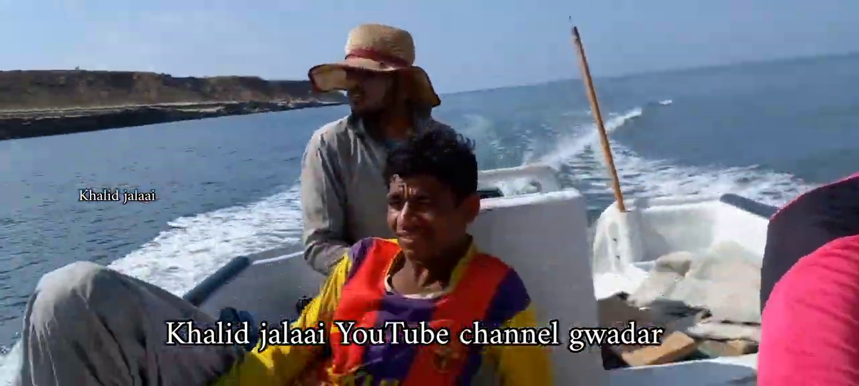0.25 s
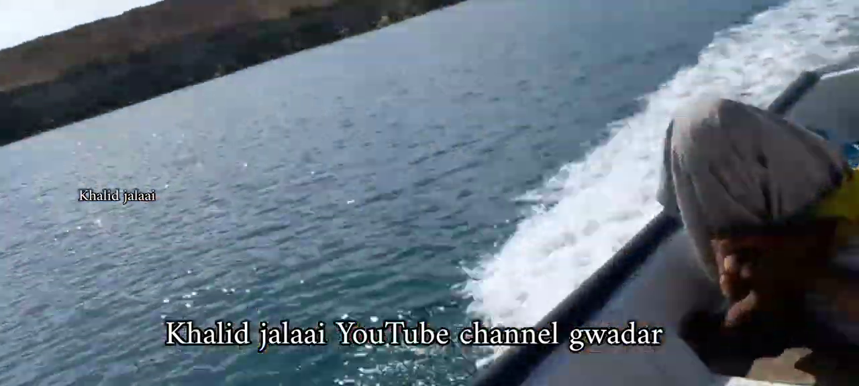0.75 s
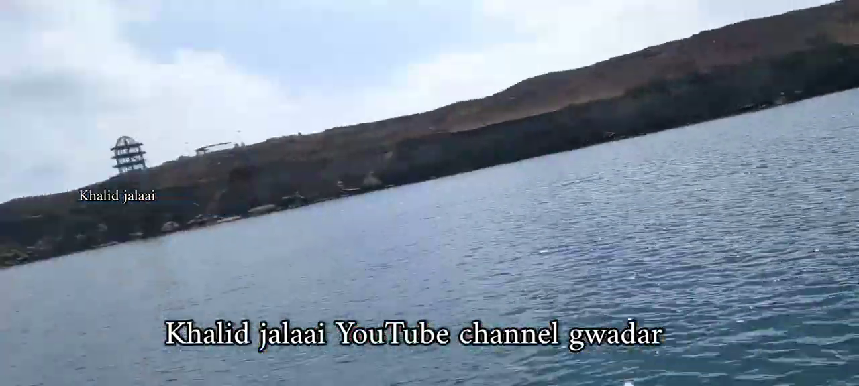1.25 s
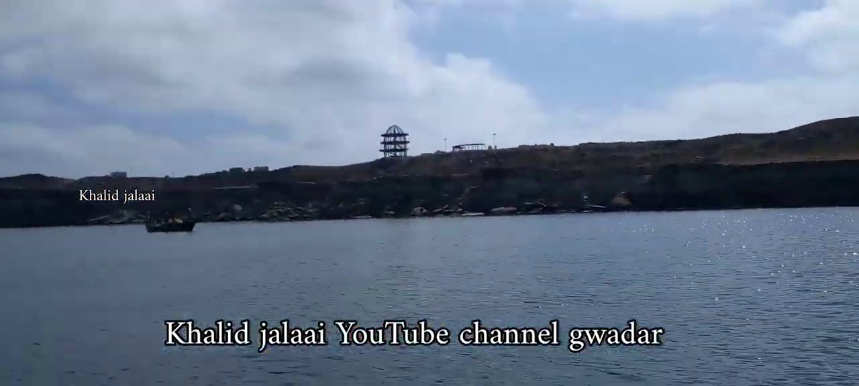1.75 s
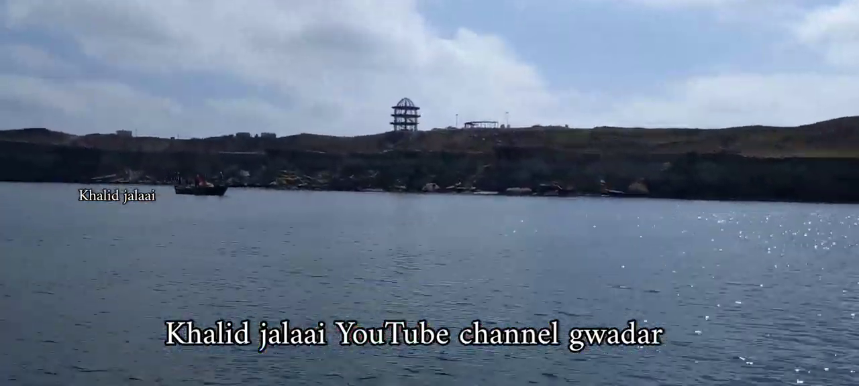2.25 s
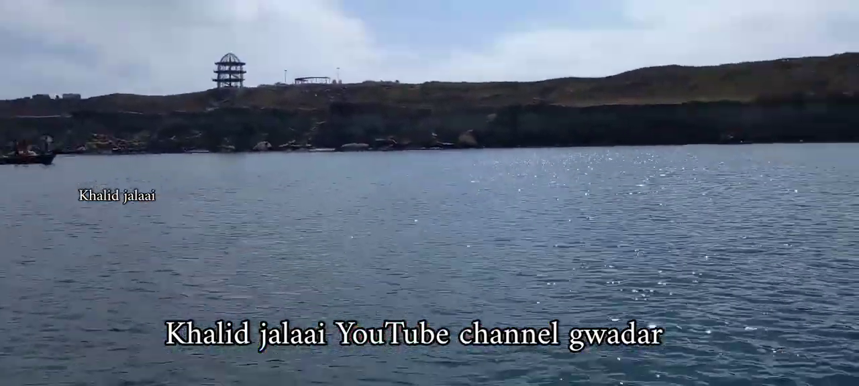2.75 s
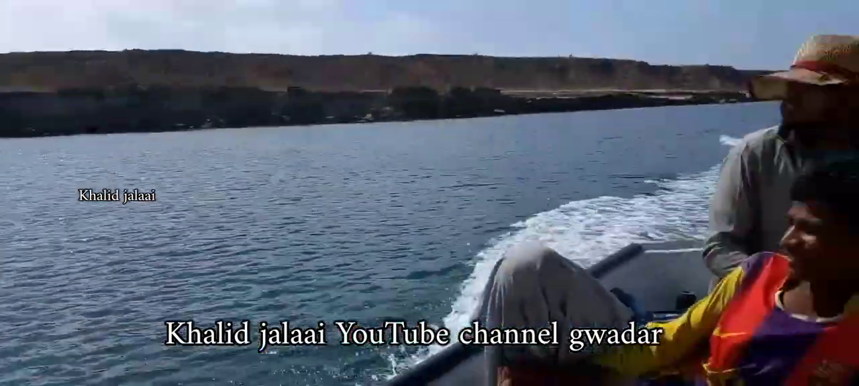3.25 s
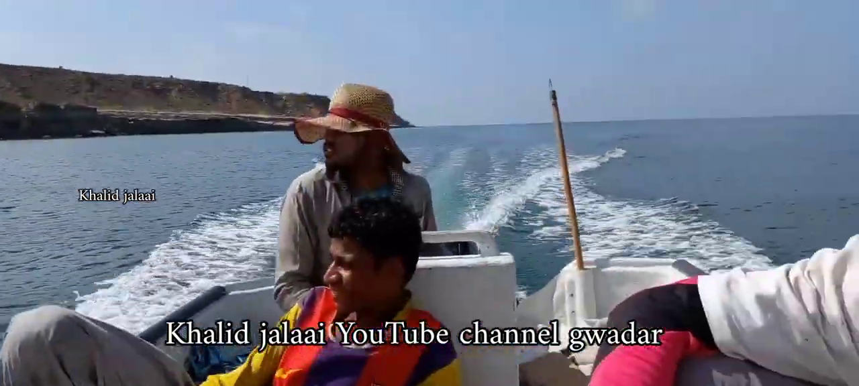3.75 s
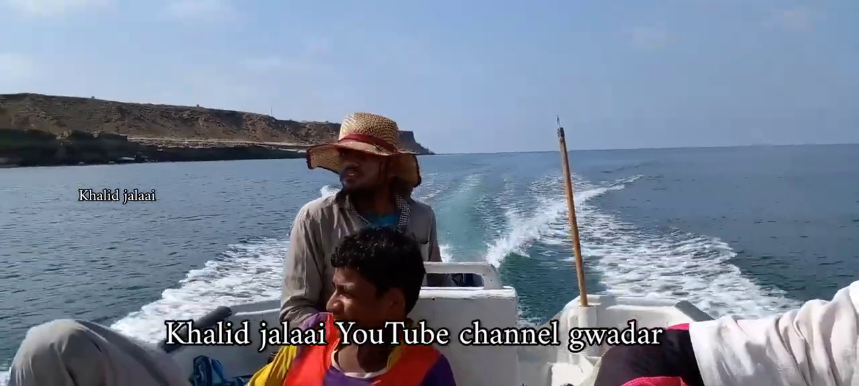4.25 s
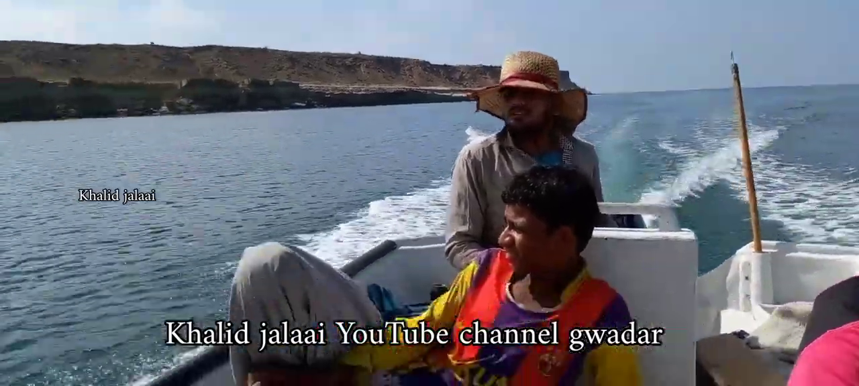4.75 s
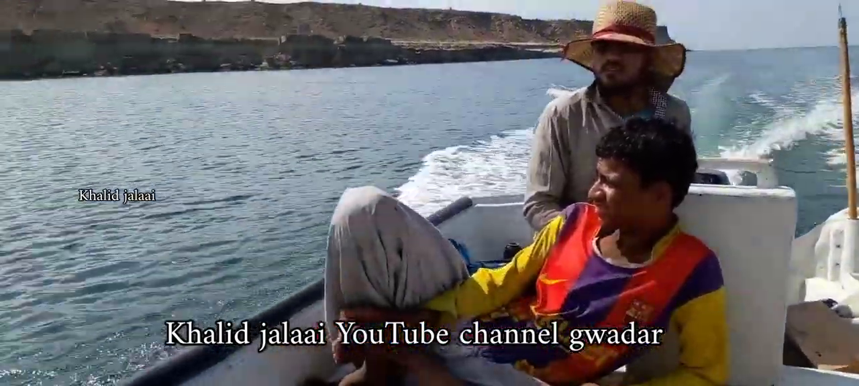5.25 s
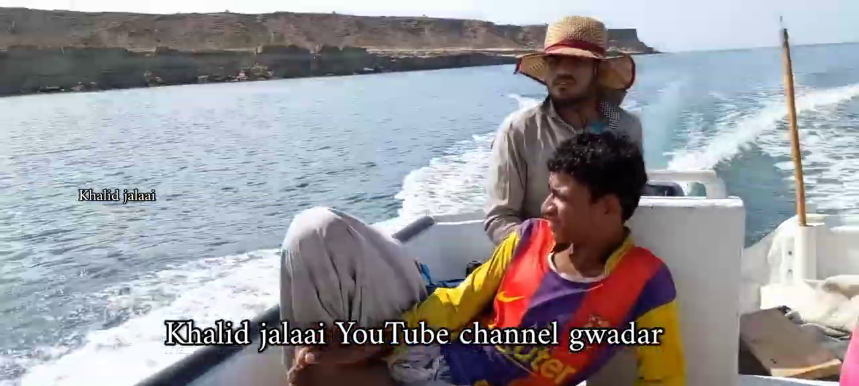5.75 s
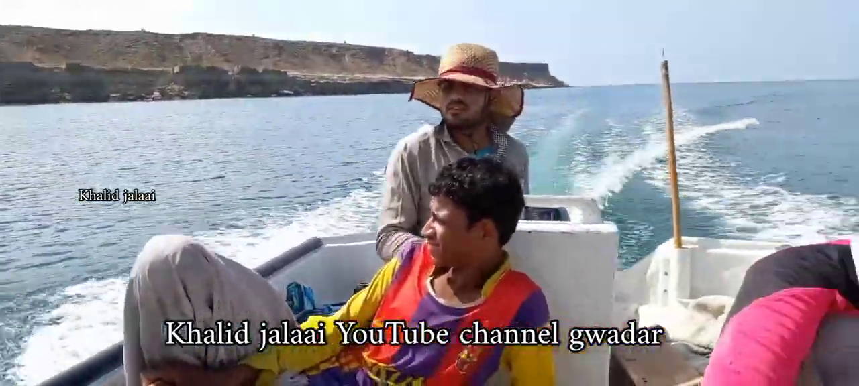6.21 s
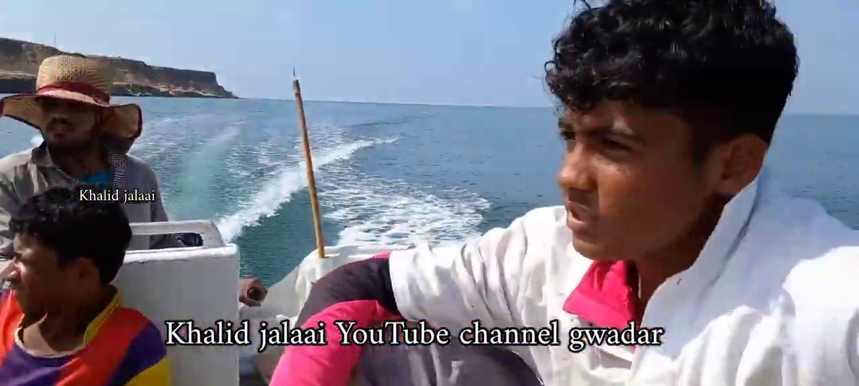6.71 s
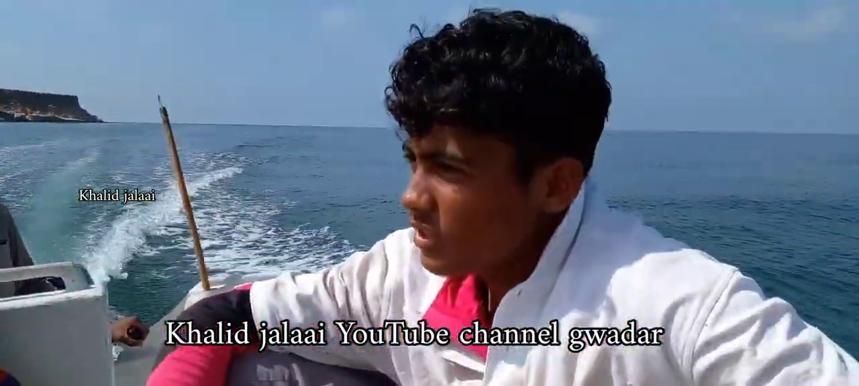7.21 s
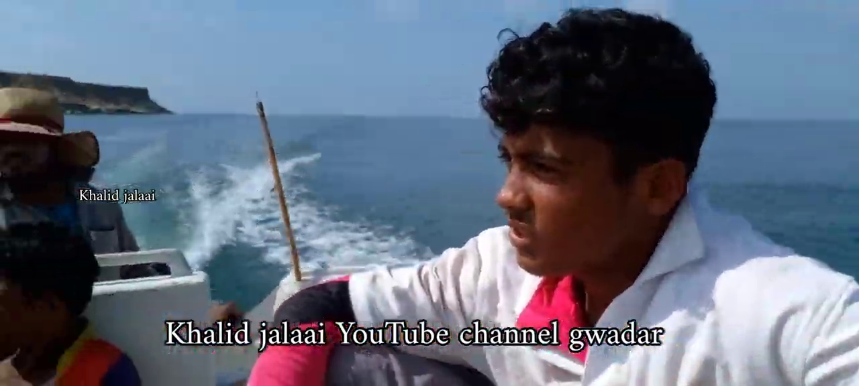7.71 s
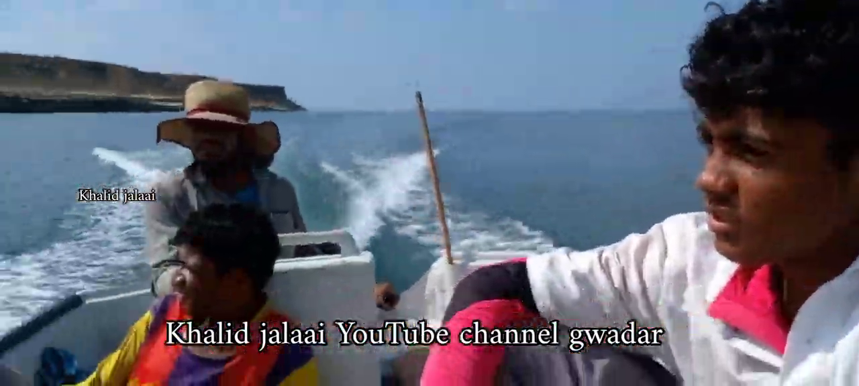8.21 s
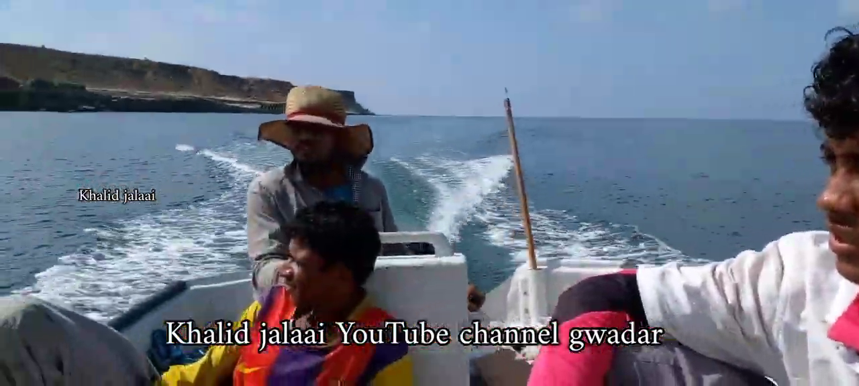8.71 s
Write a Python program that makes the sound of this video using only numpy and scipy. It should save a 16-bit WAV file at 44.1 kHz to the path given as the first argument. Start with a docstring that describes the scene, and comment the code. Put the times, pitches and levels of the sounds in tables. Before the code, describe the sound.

Aboard a small open boat at cruising speed, a two-stroke outboard drones low and raspy without pause, its cover rattling and propeller thrumming. Hard wind gusts thump the handheld microphone early on, then return in shorter bouts. Water rushes and hisses past the hull, swelling past the middle. Near the end the metallic rattle stands out as a last gust arrives.

```python
"""A small open boat cruises along a coast, heard on board through a hand-held microphone that moves about.
Throughout, a two-stroke twin outboard drones (shaft-locked tones), its propeller thrums, its cowling rattles
and the bow wave rushes and hisses (filtered noise and droplets). Wind gusts (shaped noise) buffet the microphone
hardest from 0.7 to 1.7 s, then in bouts; a hand hollows the rush from 0.8 to 3 s; the water swells near 5.3 s.
The engine speed sags and recovers, ending lower; the rattle is most exposed near 8.5 s, as a last gust comes."""
import sys
import numpy as np
from scipy import signal
from scipy.fft import rfft, irfft, next_fast_len
from scipy.io import wavfile
from scipy.ndimage import uniform_filter1d, minimum_filter1d

SR = 44100
rng = np.random.default_rng(int(sys.argv[2]) if len(sys.argv) > 2 else 0)


def to_wav(sig):
    """Store sig (one row per channel, or 1-D mono) as 16-bit WAV at the path in sys.argv[1].

    Samples outside -1..1 are clipped; the rate is SR.
    """
    pcm = np.clip(np.atleast_2d(sig), -1, 1) * 32767
    pcm = np.round(pcm).astype(np.int16)
    wavfile.write(sys.argv[1], SR, pcm.T)  # frames by channels


N = 395577
TIME = np.arange(N) / SR  # s

# crankshaft speed before its fine wobble: time_s, shaft_hz
SPEED = [(0, 97.3), (.8, 97.52), (2.7, 97.04), (3.1, 97.1), (3.7, 96.5), (4.4, 97.04), (5.2, 96),
         (5.6, 94.88), (6.5, 95.55), (7.65, 93.95), (8.1, 95.95), (8.97, 94.6)]
# microphone position and openness to the engine: time_s, place (0-2), exposure_db
PLACE = [(0, 0.35, -2.5), (.4, 0, 1), (1.1, 0.5, -2.5), (1.8, 0.56, -6), (2.7, 0.42, -3.5), (3.3, 0.79, -2),
         (4.3, 1.24, -3), (4.9, 1.07, -0.5), (5.6, 1.58, -1.5), (6.35, 1.6, -3), (7.3, 1.98, -3),
         (8.1, 2.2, 1), (8.55, 2.14, 2), (8.97, 1.72, -2)]
# gusts before sway: start_s, length_s, pressure_db, rumble_db (relative to pressure), eddy_hz
GUSTS = [(0, 0.17, -25.5, 0.5, 197), (0.731, 0.63, -15, -4.5, 590), (1.378, .33, -14.5, -9, 550),
         (1.781, 0.22, -20.5, -6.5, 477), (2.171, 0.64, -22, -5, 440), (2.92, 0.495, -17, -4, 488),
         (3.64, 0.11, -29, 5.5, 260), (4.326, 0.52, -24, -3, 295), (4.851, 0.22, -25.5, -4.5, 260),
         (5.86, 0.36, -22, 2, 199.9), (6.264, 0.098, -18, 5, 180), (6.587, 0.3, -31.5, 4, 240),
         (7.072, 0.056, -25.5, 7, 160), (8.501, 0.445, -21, 1.5, 291)]


def exhaust(angle):
    """Two cylinders fire once a turn each: a clean drone at twice the shaft speed, with harmonics."""
    # exhaust note as the microphone moves: time_s, firing_db, harmonic_2_db, harmonic_3_db
    exhaust_levels = [(0.02, -22, -25.5, -28), (0.306, -17, -26, -27), (0.73, -16, -34, -24.5),
                      (2.14, -19.5, -26, -47.5), (2.17, -22, -23, -54), (3.3, -16, -29, -32),
                      (3.5, -29, -38, -31.5), (3.54, -17, -43.5, -33.5), (4.08, -16.5, -40, -30.5),
                      (4.21, -16, -32.5, -32), (4.96, -19.5, -30, -27.5), (5.54, -15, -43, -34.5),
                      (5.67, -14, -32, -31), (6.23, -23.5, -32.5, -32), (6.46, -21, -31, -43.5),
                      (6.9, -22.5, -22, -39.5), (8.61, -22, -22.5, -30.5), (8.85, -19, -23, -34)]
    waver_db = 1.0
    out = 0
    for harmonic, db in enumerate(curves(exhaust_levels), start=1):
        out = out + undb(db + waver_db * walk(14)) * tone(angle, 2 * harmonic)
    return out


def overtones(angle):
    """Unequal cylinders knock the cowling once a turn, filling in shaft multiples; reflections vary by place."""
    # weaker engine tones: shaft_multiple, place_0_db, place_1_db, place_2_db
    overtone_levels = [(1, -26, -37, -30), (3, -33, -32.5, -27.5), (5, -32, -47.5, -36),
                       (7, -46, -55, -41.5), (8, -45.5, -48, -40.5), (9, -51, -59.5, -40.5),
                       (10, -41.5, -48.5, -50), (11, -53.5, -47.5, -50), (12, -49.5, -53, -41.5),
                       (13, -53, -49, -51), (14, -50.5, -53.5, -41.5), (15, -44, -38.5, -45.5),
                       (16, -42, -50.5, -46.5), (17, -63, -38.5, -44.5), (18, -51, -49, -45.5),
                       (19, -50, -57, -46.5), (20, -46.5, -48.5, -47.5), (22, -47, -45.5, -72),
                       (23, -54, -51.5, -50.5), (34, -64.5, -65, -60.5), (36, -77, -64.5, -59),
                       (38, -76.5, -64, -61.5)]
    fade_db, rough_db = 2.0, 1.07
    wander_rad, jitter_rad = 1.0, 0.016
    shaded_hz = 905.0  # exposure acts in full from here up
    place, exposure_db = curves(PLACE)
    shaft_hz, = curves(SPEED)
    # every burn comes a little early or late, which makes the high lines rasp
    angle = angle + jitter_rad * walk(95)
    out = 0
    for multiple, *levels_db in overtone_levels:
        # long waves bend round the passengers; short ones are shaded and scattered
        shortness = np.minimum(multiple * shaft_hz / shaded_hz, 1)
        place_db = np.interp(place, np.arange(len(levels_db)), levels_db)
        shade_db = shortness * (exposure_db + rough_db * walk(40))
        db = place_db + fade_db * walk(5) + shade_db
        phase = multiple * angle + wander_rad * walk(3)
        out = out + undb(db) * np.sqrt(2) * np.cos(phase)
    return out


def propeller(angle):
    """Blade beats thrum through the hull; each firing kicks the blades and adds a sum tone."""
    blades_per_turn = 3 * 13 / 27  # three blades behind a 13:27 gear, per crank turn
    middle_db, end_db = -31.5, -28.0  # at place 1; at places 0 and 2
    waver_db, sum_tone_db = 3.0, -25.0  # sum tone relative to the blade tone
    place, _ = curves(PLACE)
    db = middle_db + (end_db - middle_db) * np.abs(place - 1) + waver_db * walk(10)
    blade_tone = tone(angle, blades_per_turn)
    sum_tone = undb(sum_tone_db) * tone(angle, blades_per_turn + 2)
    return undb(db) * (blade_tone + sum_tone)


def clatter(angle):
    """Gas and piston noise comes in a burst at each firing, one cylinder harder than the other."""
    # cowling noise spectrum: freq_hz, density_db
    cowling = [(120, 2), (250, 2.5), (450, 2), (700, 1.5), (1000, -3), (1450, 0), (1850, -0.5),
               (2200, -3.5), (2700, -15), (3300, -24.5), (4500, -30)]
    base_db = -34.5  # at 0 dB exposure, place 1
    db_per_exposure_db, db_per_place = 0.81, 1
    turn_depth, firing_depth, scatter_db = 0.12, 0.22, 1.1
    place, exposure_db = curves(PLACE)
    db = base_db + db_per_exposure_db * exposure_db + db_per_place * (place - 1)
    bursts = np.exp(turn_depth * np.cos(angle) + firing_depth * np.cos(2 * angle))
    bursts = bursts * undb(scatter_db * walk(150))
    return colour(noise() * bursts, cowling) * undb(db)


def panel(angle):
    """Every turn of the shaft knocks the panel, which rings on briefly; it radiates in a beam."""
    # ring of the panel: freq_hz, gain_db
    panel_ring = [(1350, -17.5), (1450, -2.5), (1540, -8.5), (1630, -2.5), (1750, 0), (1900, -16)]
    base_db, db_per_exposure_db = -40.5, 3.5  # base at 0 dB exposure, inside the beam
    beam_edge_place, shade_db_per_place = 0.76, 13
    scatter_db, grit = 4.5, 2.2  # grit: scrape to knock ratio
    place, exposure_db = curves(PLACE)
    shade_db = shade_db_per_place * np.maximum(place - beam_edge_place, 0)
    db = base_db + db_per_exposure_db * exposure_db - shade_db
    turns = np.floor(angle / (2 * np.pi))
    knocks = np.diff(turns, prepend=0) * undb(scatter_db * walk(95))
    scrape = noise() * np.exp(np.cos(angle))
    ring = colour(knocks, panel_ring) + grit * colour(scrape, panel_ring)
    return unit(ring) * undb(db)


def shaft_angle():
    """Crank angle in radians; uneven burns and the chop make the speed waver."""
    wobble = 0.0013  # fraction of speed
    shaft_hz, = curves(SPEED)
    return 2 * np.pi * np.cumsum(shaft_hz * (1 + wobble * walk(25))) / SR


def tone(angle, multiple):
    """One line locked to the shaft, rms 1."""
    return np.sqrt(2) * np.sin(multiple * angle + rng.uniform(0, 2 * np.pi))


def wind():
    """Turbulence on the microphone: flutter over deep rumble, and tearing that grows faster than the pressure."""
    # low flutter spectrum: freq_hz, density_db
    flutter_spectrum = [(60, -20.5), (105, -4.5), (140, -2), (190, -1), (270, -0.5), (340, -5),
                        (420, -13.5), (550, -19.5), (750, -28.5), (1100, -37.5)]
    # deep rumble spectrum: freq_hz, density_db
    rumble_spectrum = [(22, -34.5), (30, -17), (40, 2.5), (52, 5), (90, 4), (125, 6.5), (170, -13.5),
                       (260, -23.5)]
    # airflow tearing spectrum: freq_hz, density_db
    tear_spectrum = [(200, -12.5), (330, -2.5), (480, -1.5), (700, -12), (950, -14), (1500, -25.5),
                     (3000, -46)]
    breeze_db, breeze_rumble_db = -28, -5.5  # steady head wind; its rumble relative to it
    attack_s, release_s = 0.028, 0.041
    sway_db, sway_hz = 2.92, 18
    flutter_ragged_db, tear_ragged_db = 2.0, 1.5
    tear_db, tear_growth, strong_db = -28.5, 1.34, -15.0  # tear_db holds at strong_db pressure

    power = undb(breeze_db) ** 2
    deep_power = undb(breeze_db + breeze_rumble_db) ** 2
    for start_s, length_s, db, rumble_db, _ in GUSTS:
        gust = undb(db) * swell(start_s, length_s, attack_s, release_s)
        power = power + gust ** 2
        deep_power = deep_power + (gust * undb(rumble_db)) ** 2
    sway = undb(sway_db * walk(sway_hz))
    pressure = np.sqrt(power) * sway
    deep_pressure = np.sqrt(deep_power) * sway

    flutter = colour(noise() * undb(flutter_ragged_db * walk(130)), flutter_spectrum)
    flutter = even(flutter, span_s=0.045)
    rumble = even(colour(noise(), rumble_spectrum), span_s=0.07)
    tear = colour(noise() * undb(tear_ragged_db * walk(110)), tear_spectrum)
    tear_gain = undb(tear_db) * (pressure / undb(strong_db)) ** tear_growth
    return flutter * pressure + rumble * deep_pressure + tear * tear_gain


def buffets():
    """The flow tears off the port abruptly, shakes it for a moment and dies within a few eddy cycles."""
    # the hardest buffets: start_s, length_s, level_db (before trim_db)
    hard_buffets = [(0.756, 0.023, -15.5), (0.899, 0.06, -17.5), (1.01, 0.02, -17), (1.055, 0.063, -12),
                    (1.136, 0.044, -16.5), (1.229, 0.045, -13.5), (1.282, 0.049, -13.5),
                    (1.405, .05, -17.5), (1.53, 0.021, -13.5), (1.643, 0.054, -16.5), (1.801, .035, -20.5),
                    (1.924, 0.043, -18.5), (2.228, 0.037, -20.5), (2.465, .05, -19), (2.645, 0.021, -18),
                    (2.8, 0.018, -15.5), (2.909, 0.033, -16.5), (3.042, 0.021, -16.5),
                    (3.113, 0.0335, -10.5), (3.313, 0.02, -11.5), (3.386, 0.013, -15.5),
                    (4.432, 0.025, -19.5), (4.674, 0.034, -16), (6.012, 0.075, -13), (6.276, 0.014, -14.5),
                    (6.321, 0.023, -8.5), (6.681, .018, -17.5), (8.675, 0.033, -12), (8.737, 0.019, -16)]
    # pressure spectrum of one eddy: rate_multiple, gain_db
    eddy_spectrum = [(.1, -18), (.3, 4.5), (.7, 2), (1, 0), (1.4, -7), (2, -14), (3, -22.5), (4.5, -31.5),
                     (7, -50)]
    ragged_db, trim_db = 3.5, 1.0
    rise_cycles, fall_cycles = 1.1, 1.6
    ref_db, db_per_octave = -15.5, 33  # the gust's eddy rate holds at ref_db; harder sheds faster
    out = np.zeros(N)
    rasp = noise() * undb(ragged_db * walk(260))
    for start_s, length_s, db in list(hard_buffets) + lesser_buffets():
        gust_hz = [gust[-1] for gust in GUSTS if gust[0] <= start_s][-1]
        eddy_hz = gust_hz * 2 ** ((db - ref_db) / db_per_octave)
        first = int(np.clip(start_s * SR, 0, N - 2))
        part = slice(first, first + SR // 5)
        age_s = TIME[part] - TIME[first]
        spectrum = [(multiple * eddy_hz, gain_db) for multiple, gain_db in eddy_spectrum]
        eddy = even(colour(rasp[part], spectrum), span_s=0.018)
        rise = np.sin(np.pi / 2 * np.minimum(age_s * eddy_hz / rise_cycles, 1)) ** 2
        fall = np.exp(-np.maximum(age_s - length_s, 0) * eddy_hz / fall_cycles)
        out[part] += undb(db + trim_db) * rise * fall * eddy
    return out


def lesser_buffets():
    """Buffets (start_s, length_s, level_db) at random inside each gust, a little below its pressure."""
    per_s, mean_length_s = 8, 0.016
    below_db, scatter_db = 2.5, 1
    rows = []
    for start_s, gust_length_s, gust_db, _, _ in GUSTS:
        # one per time slot; slots past the gust's end stay empty
        for slot, (when, span, size) in enumerate(rng.random((16, 3))):
            age_s = (slot + when) / per_s
            if age_s < gust_length_s:
                length_s = mean_length_s * (0.5 + span)
                db = gust_db - below_db + scatter_db * (2 * size - 1)
                rows.append((start_s + age_s, length_s, db))
    return rows


def water():
    """The bow wave rushes past; fine spray falls back on the surface and sizzles."""
    # water along the hull, before trims and surge: time_s, rush_db, spray_db
    water_levels = [(0.1, -49, -60), (0.118, -48.5, -62.5), (0.81, -47, -55.5), (0.9, -54, -61),
                    (1.03, -51.5, -60.5), (1.5, -52.5, -64), (1.92, -48.5, -56.5), (2.39, -51, -60.5),
                    (3.26, -49.5, -62), (3.57, -48, -56), (4.51, -50, -61.5), (5.33, -44.5, -54),
                    (5.69, -47, -57), (6.16, -47, -60), (6.74, -50, -59), (7.36, -47, -55),
                    (8.54, -47, -55), (8.9, -47.5, -56)]
    # bow wave spectrum: freq_hz, density_db
    rush_spectrum = [(400, 0), (1000, 3), (2500, 3), (3200, -3), (3800, -1.5), (4700, 0), (5500, -4),
                     (6400, -9.5), (7200, -12), (7800, -21.5)]
    # spray spectrum: freq_hz, density_db
    spray_spectrum = [(4000, -6), (7000, -1.5), (7900, -9.5), (9500, -6), (11000, -4.5), (12800, -1.5),
                      (14500, -4), (15700, -5)]
    rush_trim_db, spray_trim_db, surge_db = 5.0, 3.5, 0.67
    drop_share = 0.54  # droplets to noise ratio
    echo_gain, echo_lag_s = 0.38, 0.00014
    rush_db, spray_db = curves(water_levels)
    surge = surge_db * walk(24)
    rush = colour(noise() + drop_share * droplets(2300, spread_db=3.5), rush_spectrum)
    # a hand beside the microphone reflects the rush; the short echo hollows it near 4 kHz
    echo = echo_gain * swell(0.82, 2.2, attack_s=0.03, release_s=0.25)
    rush = rush + echo * np.interp(TIME - echo_lag_s, TIME, rush)
    spray = colour(noise() + drop_share * droplets(1500, spread_db=3.0), spray_spectrum)
    rush_gain = undb(rush_db + rush_trim_db + surge)
    spray_gain = undb(spray_db + spray_trim_db + surge)
    return rush * rush_gain + spray * spray_gain


def droplets(rate_hz, spread_db):
    """Tiny impacts at random moments, a few much larger than the rest; rms 1."""
    hit = rng.random(N) < rate_hz / SR
    size = np.minimum(rng.exponential(size=N), 6)
    sign = np.sign(noise())
    return unit(hit * sign * undb(spread_db * size))


def undb(db):
    """Decibels to gain."""
    return 10 ** (np.asarray(db) / 20)


def curves(table):
    """The columns of a time table, joined by straight lines."""
    time_s, *columns = np.transpose(table)
    return [np.interp(TIME, time_s, column) for column in columns]


def unit(x):
    """Scale to rms 1."""
    return x / np.sqrt(np.mean(x ** 2))


def noise():
    """White noise."""
    return rng.standard_normal(N)


def colour(x, points):
    """Filter by a (Hz, dB) spectrum that falls 24 dB an octave beyond its ends; the result has rms 1."""
    size = next_fast_len(len(x) + 4096, True)
    hz, db = np.transpose(points)
    point_octave = np.log2(hz)
    octave = np.log2(np.maximum(np.arange(size // 2 + 1) * SR / size, 1))
    beyond = np.abs(octave - np.clip(octave, point_octave[0], point_octave[-1]))
    gain = undb(np.interp(octave, point_octave, db) - 24 * beyond)
    return unit(irfft(rfft(x, size) * gain, size)[:len(x)])


def walk(rate_hz):
    """Smooth chance with rms 1, changing about rate_hz times a second."""
    knots = rng.standard_normal(4096)
    path = np.interp(TIME * rate_hz, np.arange(len(knots)), knots)
    return unit(uniform_filter1d(path, max(int(SR / rate_hz / 2), 1)))


def even(x, span_s):
    """Take the slow swells out of a noise and keep its fine grain."""
    power = uniform_filter1d(x ** 2, max(int(span_s * SR), 2))
    return x / np.sqrt(power + 1e-6)


def swell(start_s, length_s, attack_s, release_s):
    """Rise, hold until the length is over, die away."""
    age_s = TIME - start_s
    rise = np.clip(age_s / attack_s, 0, 1)
    return rise * np.exp(-np.maximum(age_s - length_s, 0) / release_s)


def scene():
    """Engine, water and wind sum at one microphone in the open air."""
    angle = shaft_angle()
    outboard = exhaust(angle) + overtones(angle) + propeller(angle) + clatter(angle) + panel(angle)
    ease_in = np.minimum(TIME / 0.004, 1)
    return ((outboard + wind() + buffets() + water()) * ease_in)[None]


def record(dry):
    """The microphone drops the deepest bass, a look-ahead limiter holds the peaks, the top is cut."""
    port_hz, top_hz = 42, 15650
    ceiling, hold_s = 0.92, 0.012  # ceiling re full scale, ahead of the top cut
    bass_cut = signal.butter(4, port_hz, "highpass", fs=SR, output="sos")
    sound = signal.sosfilt(bass_cut, dry)
    size = max(int(hold_s * SR), 2)
    gain = np.minimum(1, ceiling / (np.abs(sound) + 1e-9))
    gain = uniform_filter1d(minimum_filter1d(gain, 2 * size), size)
    top_cut = signal.ellip(10, 0.1, 80, top_hz, fs=SR, output="sos")
    return signal.sosfilt(top_cut, sound * gain)


dry = scene()
out = record(dry)
to_wav(out)
```